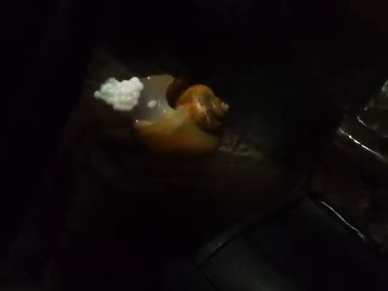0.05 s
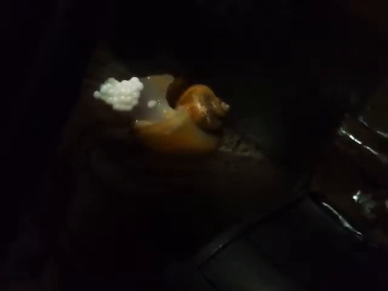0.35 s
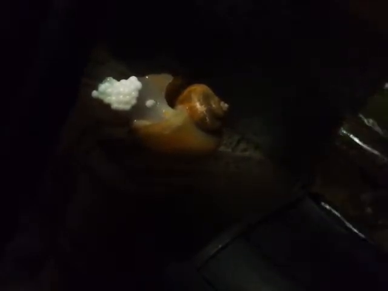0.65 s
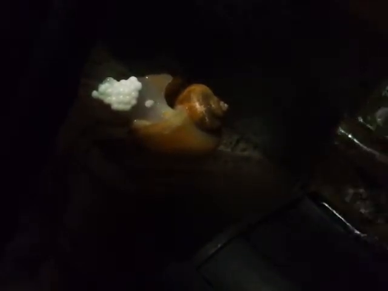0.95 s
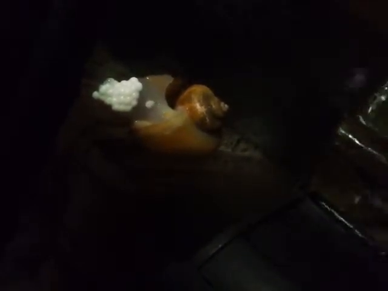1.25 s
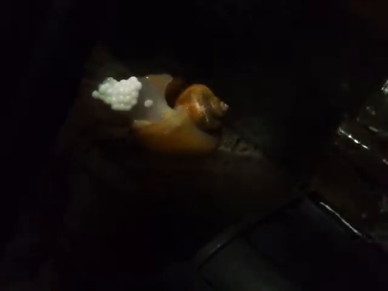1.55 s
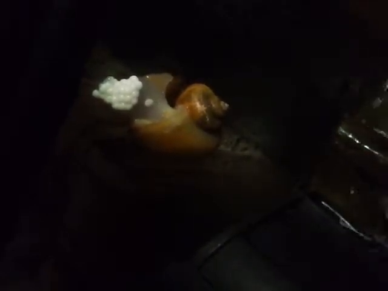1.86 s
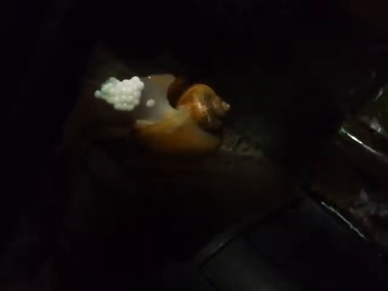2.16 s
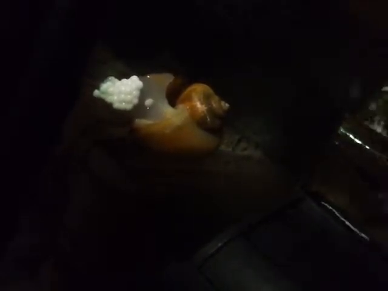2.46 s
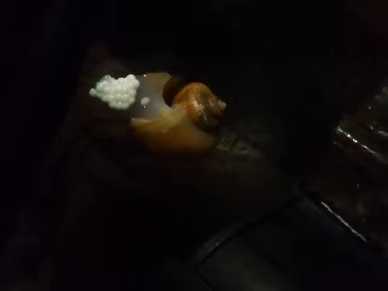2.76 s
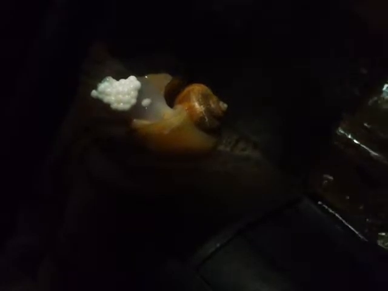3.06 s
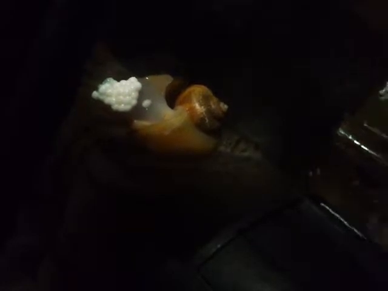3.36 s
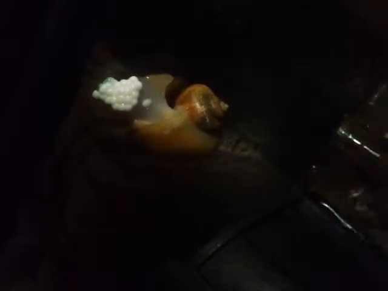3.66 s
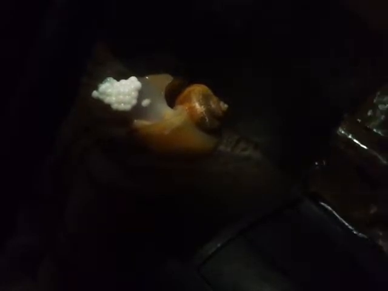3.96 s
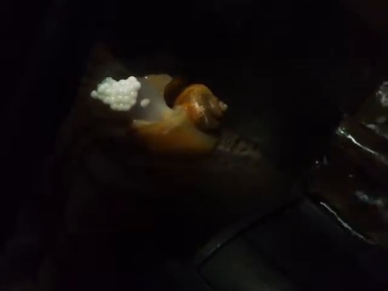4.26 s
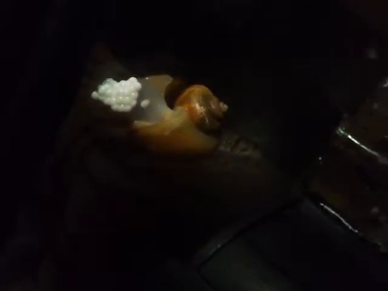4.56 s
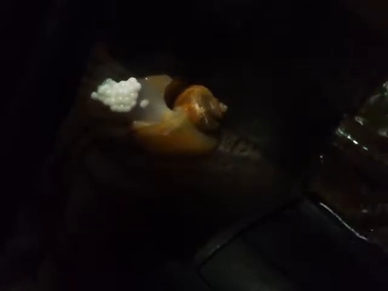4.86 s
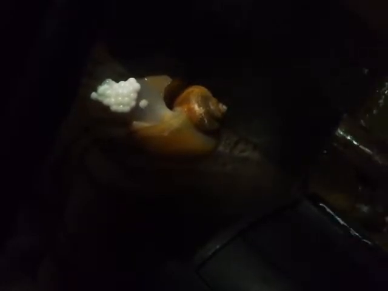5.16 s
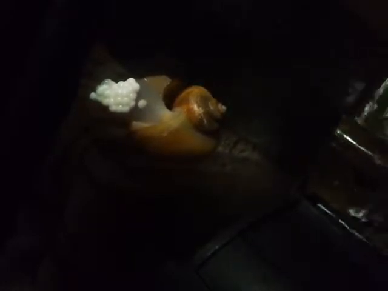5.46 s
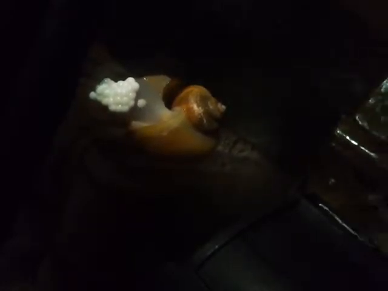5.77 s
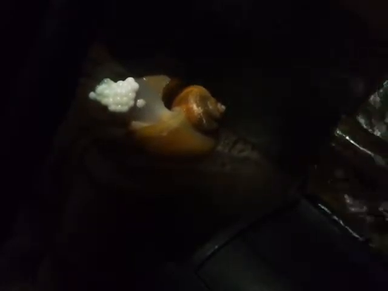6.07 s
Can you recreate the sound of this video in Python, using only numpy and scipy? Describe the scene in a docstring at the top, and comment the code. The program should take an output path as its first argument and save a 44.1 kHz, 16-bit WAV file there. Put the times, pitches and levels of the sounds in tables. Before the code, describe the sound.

Water trickles and plinks into a fish tank from a running filter, over a steady low pump hum.

```python
"""Drops from the outflow of an aquarium filter plink into the tank, indoors, close to the microphone.
Each drop traps an air bubble, a damped oscillator that rings for a few milliseconds; the glass walls
and the air space above the water scatter and colour the sound. Softer drips, fine spray and faint
gurgles fill the gaps, and the pump hums on harmonics of the mains frequency."""
import sys
import numpy as np
from scipy import signal
from scipy.fft import rfft, irfft, next_fast_len
from scipy.io import wavfile
from scipy.ndimage import uniform_filter1d

SR = 44100
rng = np.random.default_rng(int(sys.argv[2]) if len(sys.argv) > 2 else 0)


def inscribe(sig):
    """Save sig as 16-bit PCM at rate SR to the path in sys.argv[1].

    A 1-D sig is mono; a 2-D sig holds one channel per row.
    Samples are clipped to [-1, 1] before scaling.
    """
    pcm = np.round(np.clip(np.atleast_2d(sig).T, -1, 1) * 32767)
    wavfile.write(sys.argv[1], SR, pcm.astype(np.int16))


N = 279149

# pump hum: multiple of the mains frequency, rms level/dB
HUM_HARMONICS = [(2, -64.5), (3, -39), (4, -51), (5, -32), (6, -57.5), (7, -67), (8, -84.5)]
# rumble of the pump housing and the room: f/Hz, relative level/dB
RUMBLE_SPECTRUM = [(20, -24), (55, -14), (110, -8), (160, -8.5), (200, 1), (290, -8.5), (340, -10.5),
                   (450, -15.5), (540, -2.5), (630, -23), (1000, -42.5), (5000, -23), (8000, -47)]
# larger air pockets: t/s, level/dB, starting f/Hz
AIR_POCKETS = [(2.705, -35.5, 922), (3.475, -35.5, 895), (3.605, -33, 738), (5.43, -35, 787)]
# resonances of the air space above the water: f/Hz, bandwidth/Hz, gain/dB
TANK_MODES = [(969, 17, 14.5), (1566, 24, 5.5), (1755, 39, 9.5), (1956, 19, 14.5), (2240, 30, 14.5),
              (2415, 32.6, 19.5), (3275, 190, 8.5), (3390, 33, -11.5), (4187, 38, 13), (4704, 31.5, 13),
              (5070, 52, 6.5), (5390, 30, 9)]
# splash of one drop: f/Hz, relative level/dB
SPLASH_SPECTRUM = [(400, -15.5), (950, -9.5), (1200, -14), (1800, 13.5), (2800, -10.5), (3500, 16),
                   (6000, 9.5)]
# strength of the spray's bubbles by pitch: f/Hz, relative level/dB
SPRAY_LEVELS = [(680, -20.5), (900, -11), (1200, -15.5), (1800, -1), (2700, -6), (3400, 8), (5200, 5.5),
                (6500, 0)]
# pitches a drip sets ringing, a low tank note near 790 Hz and then its bubbles:
# f/Hz, scatter/octaves, relative level of a heavy drip/dB, range below it/dB
DRIP_PITCHES = [(790, .08, -32, 19), (984, .12, -31.5, 33), (1751, .25, -18.5, 18), (3320, 0.15, -15.5, 20),
                (5274, .13, -15, 10)]
# slow swell of the trickle: t/s, gain of high pitches/dB, gain of low pitches/dB
TRICKLE_SWELL = [(0.0, -0.7, 3.5), (0.601, -3.2, 0), (0.9, 7, 2.8), (1.11, -21.5, -5), (1.31, -4.3, -8),
                 (1.808, -3, 4.5), (2.109, 1.5, -10.5), (2.71, -6, -11), (2.81, -10, 11.5),
                 (3.01, -12, -16), (3.52, 1, 7), (3.82, 5.5, -3.5), (4.219, 5.5, -2), (4.319, -4.5, -5.5),
                 (5.428, -2, 1.5), (5.83, -5.2, -1.5), (6.13, -12, 3.5), (6.33, 5.3, -7)]
# the loudest drops: t/s, relative level/dB, bubble f/Hz
LOUD_DROPS = [(0.0029, -16, 904), (0.033, -14, 3480), (0.1479, -12.5, 3300), (0.2669, -23.5, 940),
              (0.282, -14.5, 3330), (0.4566, -14.5, 5220), (0.5188, -12.5, 3380), (0.5978, -16.5, 3510),
              (0.657, -7.0, 4640), (0.6573, -14.5, 2530), (0.6715, -13.5, 4800), (0.7318, -10.5, 5420),
              (0.878, -14, 5400), (0.9509, -15, 3250), (1.0916, -24.5, 1070), (1.1835, -10, 3700),
              (1.2023, -17, 1850), (1.2944, -11.5, 5160), (1.3706, -12, 3360), (1.4347, -9, 3560),
              (1.5038, -17.5, 5620), (1.5615, -18.5, 1970), (1.6554, -13.5, 4590), (1.9364, -13.0, 4330),
              (2.0057, -6.5, 3760), (2.041, -5, 5140), (2.1459, -11, 1666), (2.1703, -13.5, 5140),
              (2.2594, -14, 5340), (2.4634, -6.5, 4830), (2.4654, -16, 1840), (2.539, -15.0, 1540),
              (2.7515, -11.5, 4000), (2.8071, -7, 3990), (2.8168, -15.5, 1680.0), (2.8164, -11, 4500),
              (2.8702, -14.5, 5000), (3.0826, -14.5, 1810), (3.149, -6, 4890), (3.2921, -16, 1960),
              (3.4078, -13.5, 2010), (3.42, -16, 2230), (3.493, -12, 3310), (3.679, -18.5, 5550),
              (3.6977, -12.5, 2540), (3.7227, -6.5, 5280), (3.7533, -8.5, 4490), (3.8462, -10.5, 3630),
              (3.8854, -12.5, 4790), (3.8855, -9.5, 1790), (3.9096, -10.5, 4970), (3.9523, -9, 5460),
              (3.9916, -18.5, 1664), (4.032, -12.5, 3670), (4.0493, -8, 4910), (4.09, -17, 1794),
              (4.1893, -7.5, 4010), (4.255, -16, 2920), (4.3691, -17.0, 1740), (4.6, -10.0, 4900),
              (4.7097, -14.5, 4730), (4.7607, -14.0, 1440), (4.7902, -13.0, 4300), (4.8486, -7.0, 4480),
              (4.9857, -12.5, 2020), (5.073, -8.5, 5060), (5.1457, -19, 960), (5.2189, -15, 3090),
              (5.2661, -7.5, 4400), (5.4276, -3, 5130), (5.7538, -11, 5630), (5.9507, -9.5, 5100.0),
              (6.0063, -15, 5800), (6.0084, -15.5, 1830), (6.126, -13.5, 4480), (6.1788, -14, 3540),
              (6.2299, -6, 4355)]
# treble loss of the microphone: f/Hz, gain/dB
MIC_RESPONSE = [(5000, -2.5), (5900, -0.5), (6500, -5), (7100, -12), (7600, -19), (8100, -31),
                (9000, -37.5), (9600, -71)]


def amp(db):
    return 10 ** (np.asarray(db) / 20)


def unit(x):
    """Normalisation to rms 1."""
    return x / np.sqrt(np.mean(x ** 2) + 1e-20)


def level_at(spectrum, hz):
    """Interpolation of (f/Hz, level/dB) points on a log-frequency axis."""
    f, db = np.transpose(spectrum)
    return np.interp(np.log(hz + 1), np.log(f + 1), db)


def colour(x, spectrum):
    """Zero-phase filtering by a spectrum in dB."""
    size = next_fast_len(len(x))
    gain = amp(level_at(spectrum, np.fft.rfftfreq(size, 1 / SR)))
    return irfft(rfft(x, size) * gain, size)[:len(x)]


def add(mix, start, sound):
    """Superposition of a sound from a start time in seconds."""
    part = mix[max(round(start * SR), 0):][:len(sound)]
    part += sound[:len(part)]


def decay(t, t60):
    """Exponential damping by 60 dB in t60."""
    return np.exp(-np.log(1000) * t / t60)


def echoes(t, t60, delay):
    """Diffuse reflection: a random tail of energy 1 that begins after a delay."""
    tail = rng.standard_normal(len(t)) * decay(t, t60) * (t > delay)
    return tail / np.linalg.norm(tail)


def room(x, t60=0.11, wet_db=-17):
    """Reverberation: a small furnished room adds a faint tail."""
    response = echoes(np.arange(SR // 2) / SR, t60, delay=0.013)
    return x + amp(wet_db) * signal.fftconvolve(x, response)[:N]


def pump(mains_hz=59.98, waver=0.042, rumble_db=-44):
    """Forced vibration at mains harmonics, wavering slightly in level, over a soft rumble."""
    t = np.arange(N) / SR
    knots = np.linspace(0, t[-1], 90)
    hum = np.zeros(N)
    for order, db in HUM_HARMONICS:
        sway = 1 + waver * np.interp(t, knots, rng.standard_normal(len(knots)))
        cycles = order * mains_hz * t + rng.random()
        hum += amp(db) * sway * np.sqrt(2) * np.sin(2 * np.pi * cycles)
    rumble = unit(colour(rng.standard_normal(N), RUMBLE_SPECTRUM))
    return hum + amp(rumble_db) * rumble


def gurgles(swell_s=0.016, sag_per_s=1.2, waver=0.03, faint_db=-50, faint_hz=840, count=45):
    """Resonance of air pockets: brief tones whose pitch sinks and wavers as the pockets spread."""
    t = np.arange(SR // 5) / SR
    envelope = t / swell_s * np.exp(1 - t / swell_s)
    faint = [(rng.uniform(0, N / SR), faint_db, faint_hz * np.exp(0.19 * (rng.random() - .5)))
             for _ in range(count)]
    out = np.zeros(N)
    for start, db, hz in list(AIR_POCKETS) + faint:
        wobble = waver * unit(uniform_filter1d(rng.standard_normal(len(t)), size=200))
        cycles = np.cumsum(hz * np.exp(wobble - sag_per_s * t)) / SR
        add(out, start, amp(db) * envelope * np.sin(2 * np.pi * cycles))
    return out


def tank_ring(t):
    """Normal modes of the air space: the impulse response is a sum of damped cosines."""
    hz, width, db = np.transpose(TANK_MODES)[:, :, None]
    envelopes = amp(db) * 2 * np.pi * width / SR * np.exp(-np.pi * width * t)
    return (envelopes * np.cos(2 * np.pi * hz * t)).sum(0)


def bubble(t, hz, swell, rise=0.01):
    """Damped oscillation: a bubble swells as its neck closes, then dies; large, low ones ring longer."""
    length, climb = np.clip(rng.standard_normal(2), -2, 2)
    peak_s = swell * (SR / 10 / hz) ** 0.45 * np.exp(0.34 * length)
    age = np.maximum(t, 0) / peak_s
    pitch = hz * (1 + rise * (1 + climb) * (np.minimum(age, 10) - 2))  # most rise near the surface
    return age * np.exp(1 - age) * np.sin(2 * np.pi * np.cumsum(pitch) / SR)


def plink(t, ring, hz, swell, splash_db, twin_db=-5, walls_db=2):
    """Air entrainment: one drop's two bubbles and splash, heard through the tank; rms 1 at the onset."""
    # the cavity pinches off a second bubble, mostly a smaller one
    twin_hz = hz * np.exp(0.1685 * (rng.standard_normal() + .5))
    twin_lag = .002 * rng.uniform(0.71, 1.937)
    twin = amp(twin_db) * bubble(t - twin_lag, twin_hz, swell)
    fizz = colour(rng.standard_normal(len(t)), SPLASH_SPECTRUM)
    splash = amp(splash_db) * fizz * decay(t, t60=0.019)
    path = ring + amp(walls_db) * echoes(t, t60=0.04, delay=0.0015)  # each spot has its own wall echoes
    path[0] += 1  # direct sound
    sound = signal.fftconvolve(bubble(t, hz, swell) + twin + splash, path)[:len(t)]
    return sound / np.sqrt(np.mean(sound[:256] ** 2))


def gathering(times, lead_s):
    """Accumulation of water: a weight that grows from 0 to 1 just ahead of each loud drop."""
    falls = np.sort(np.array(LOUD_DROPS)[:, 0])
    wait = np.append(falls, np.inf)[np.searchsorted(falls, times)] - times
    return np.exp(-wait / lead_s)


def spray(t, ring, patter_db=-37, thrown_db=-28, spread_db=6, hush_db=12, count=950, sizes=200):
    """Resonance of many small bubbles: a running patter, and a droplet thrown up by each loud drop."""
    pitches = np.linspace(np.sqrt(SPRAY_LEVELS[0][0]), np.sqrt(SPRAY_LEVELS[-1][0]), sizes) ** 2
    plinks = [amp(level_at(SPRAY_LEVELS, hz)) * plink(t, ring, hz, swell=0.00066, splash_db=-17.5)
              for hz in pitches]
    times = rng.uniform(0, N / SR, count)
    patter = list(zip(times, patter_db - hush_db * gathering(times, lead_s=0.0059)))
    thrown = [(fall + .013 * rng.uniform(.5, 2), thrown_db) for fall, _, _ in sorted(LOUD_DROPS)]
    out = np.zeros(N)
    for start, db in patter + thrown:
        scatter_db = spread_db * np.clip(rng.standard_normal(), -2, 2)
        add(out, start, amp(db + scatter_db) * plinks[rng.integers(sizes)])
    return out


def drips(jitter=0.39, hush_db=20, headroom_db=2, low_below_hz=2600, count=180):
    """Break-up of a stream into loosely regular drips; one row a pitch: t/s, level/dB, f/Hz."""
    times = (np.arange(count) + .5 + jitter * rng.standard_normal(count)) * N / SR / count
    hush = hush_db * gathering(times, lead_s=0.011)
    knots, high_db, low_db = np.transpose(TRICKLE_SWELL)
    drip_weakness = rng.random(count)
    rows = []
    for hz, octaves, heavy_db, range_db in DRIP_PITCHES:
        # a heavy drip tends to ring at every pitch
        weakness = np.where(rng.random(count) < .5, drip_weakness, rng.random(count))
        flow_db = np.interp(times, knots, low_db if hz < low_below_hz else high_db)
        db = heavy_db - range_db * weakness - hush + flow_db
        db = np.minimum(db, heavy_db + headroom_db)  # a drip can only grow so large
        pitches = hz * 2 ** (octaves * np.clip(rng.standard_normal(count), -2, 2))
        rows += zip(times, db, pitches)
    return rows


def drops(t, ring, falls, swell, splash_db, gain_db=-1.5):
    """Impact excitation: falling water sounds one clear plink for each row of falls."""
    out = np.zeros(N)
    for start, db, hz in falls:
        add(out, start, amp(db + gain_db) * plink(t, ring, hz, swell, splash_db))
    return out


def scene():
    """Superposition of the pump and the reverberant water, in one channel."""
    t = np.arange(3000) / SR  # the span of one plink
    ring = tank_ring(t)
    hum = pump()
    loud = drops(t, ring, LOUD_DROPS, swell=0.00074, splash_db=-16.5)
    trickle = drops(t, ring, drips(), swell=0.00066, splash_db=-14)
    water = loud + trickle + spray(t, ring) + gurgles()
    return (hum + room(water))[None]


def record(dry, ceiling=.735, cutoff_hz=17000):
    """Band limiting and saturation: the microphone loses treble and the loudest plinks flatten."""
    dull = colour(dry[0], MIC_RESPONSE)
    limited = dull / (1 + (dull / ceiling) ** 12) ** (1 / 12)
    lowpass = signal.firwin(255, cutoff_hz, window=("kaiser", 9), fs=SR)
    return signal.oaconvolve(limited, lowpass, "same")[None]


dry = scene()
out = record(dry)
inscribe(out)
```